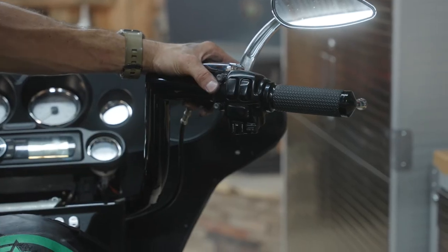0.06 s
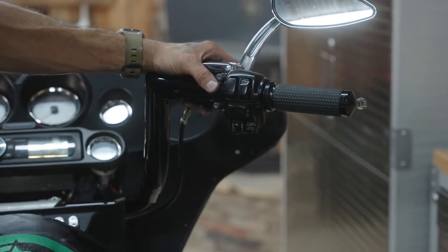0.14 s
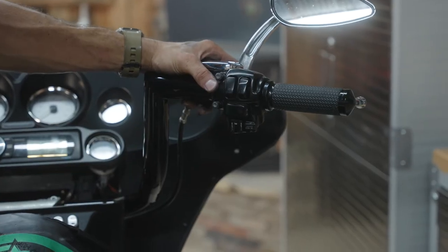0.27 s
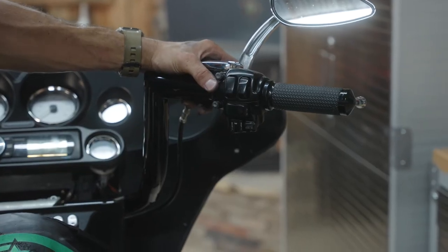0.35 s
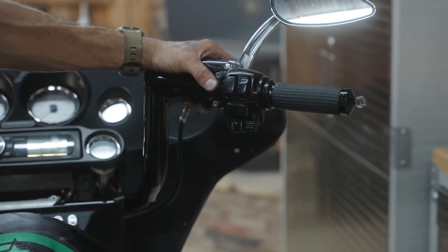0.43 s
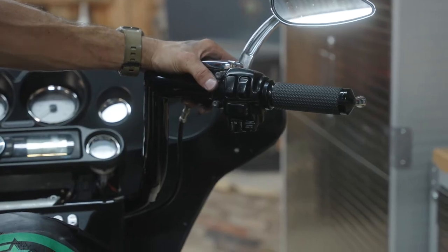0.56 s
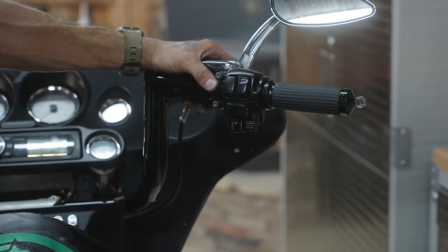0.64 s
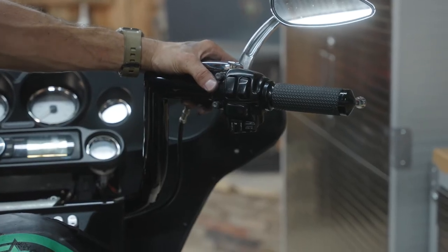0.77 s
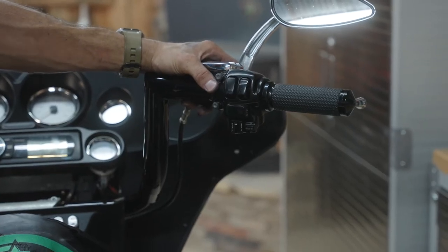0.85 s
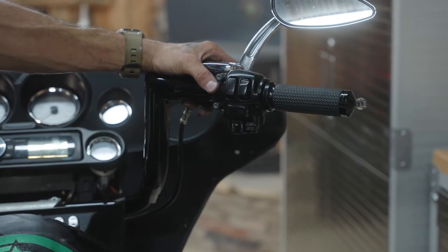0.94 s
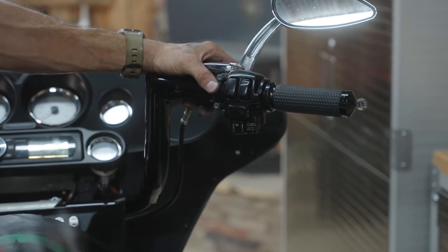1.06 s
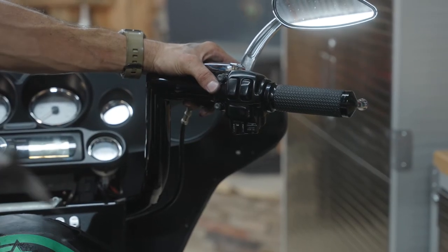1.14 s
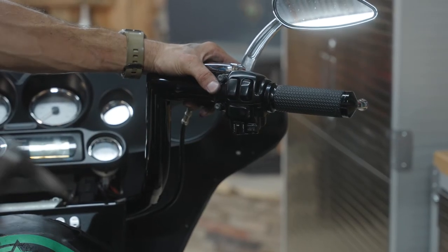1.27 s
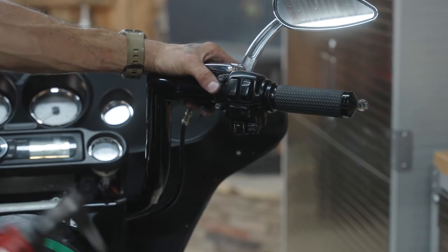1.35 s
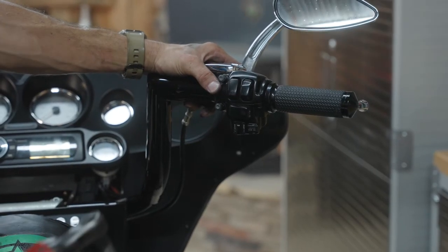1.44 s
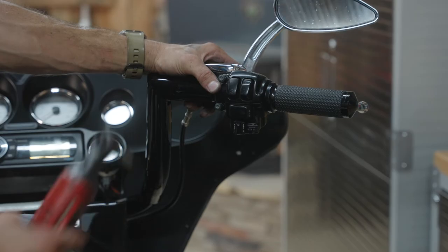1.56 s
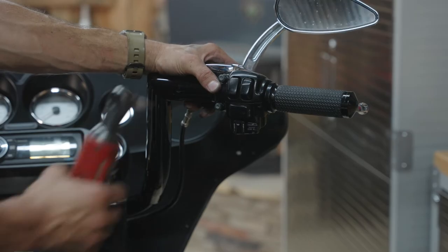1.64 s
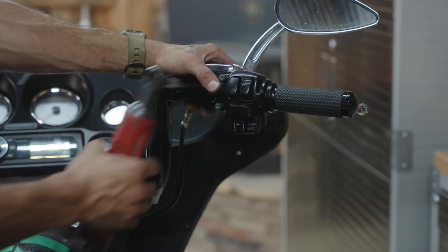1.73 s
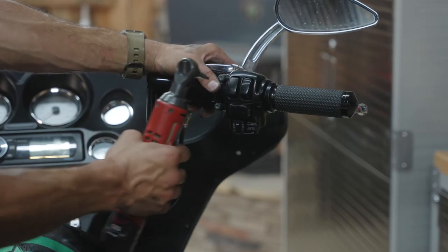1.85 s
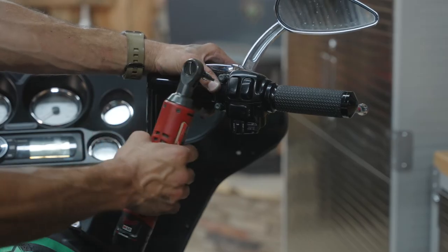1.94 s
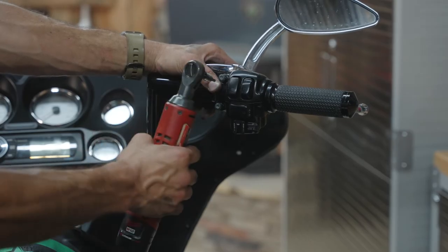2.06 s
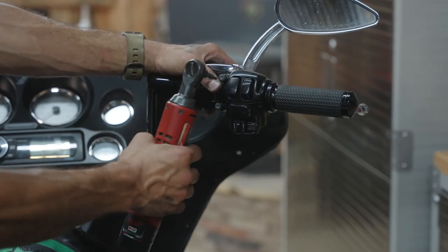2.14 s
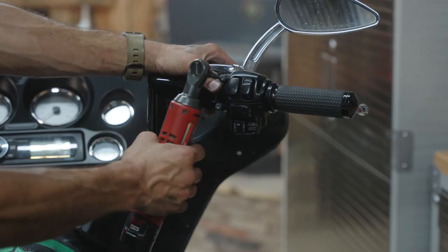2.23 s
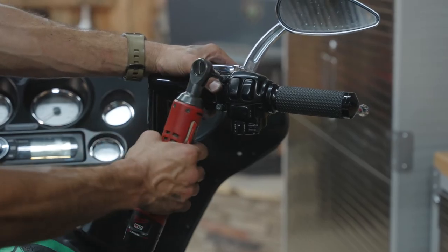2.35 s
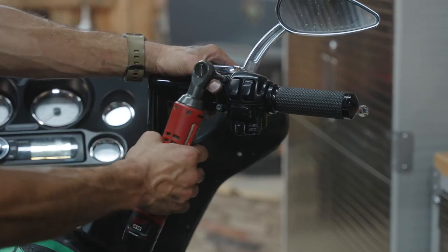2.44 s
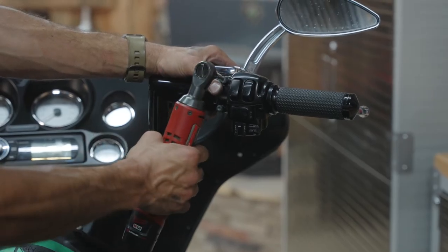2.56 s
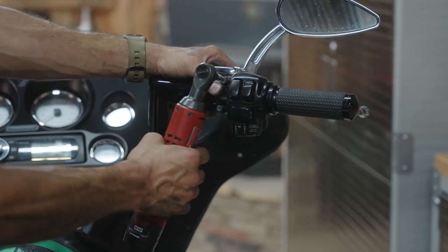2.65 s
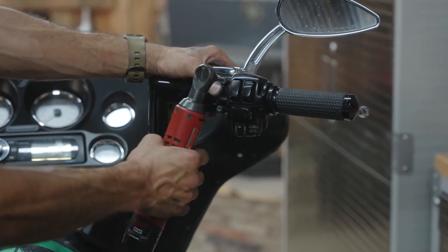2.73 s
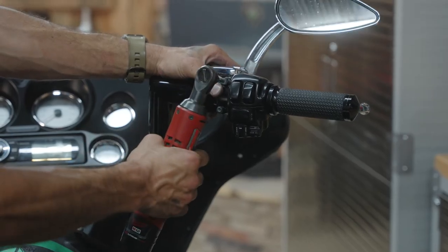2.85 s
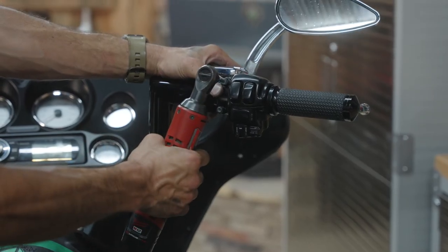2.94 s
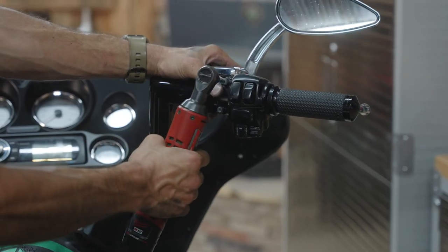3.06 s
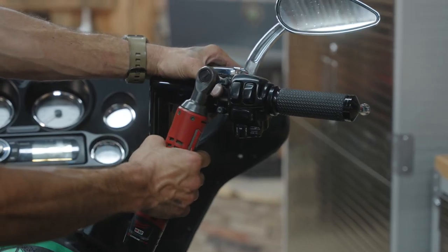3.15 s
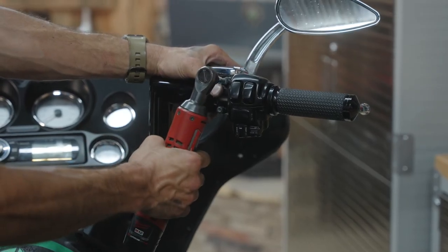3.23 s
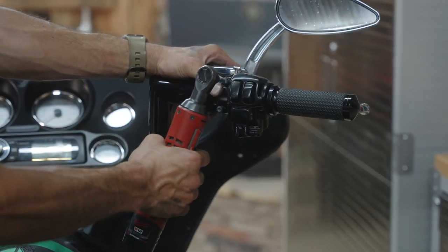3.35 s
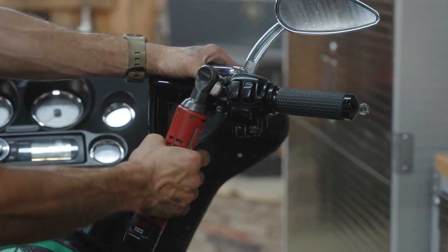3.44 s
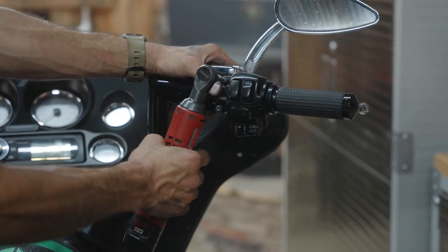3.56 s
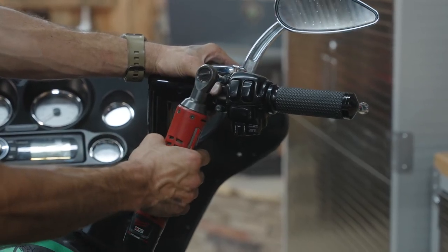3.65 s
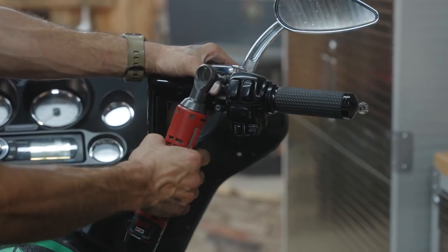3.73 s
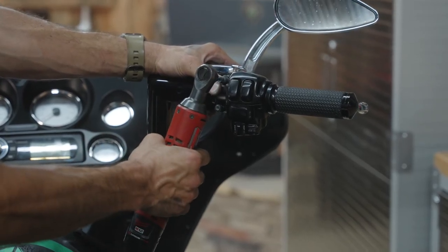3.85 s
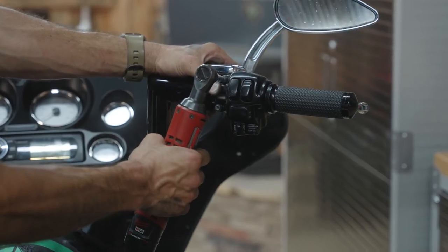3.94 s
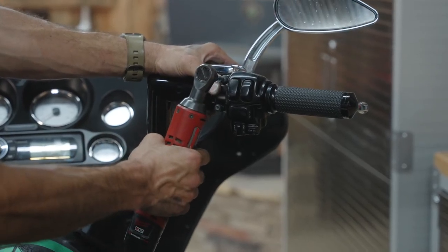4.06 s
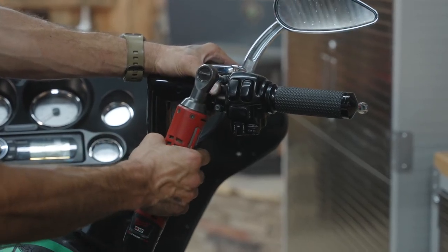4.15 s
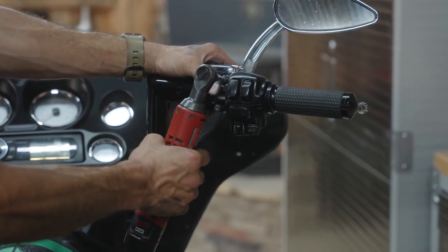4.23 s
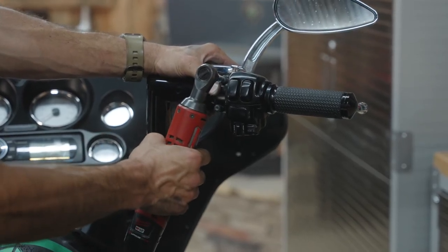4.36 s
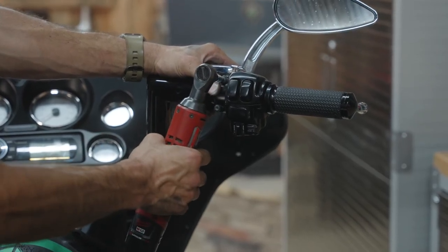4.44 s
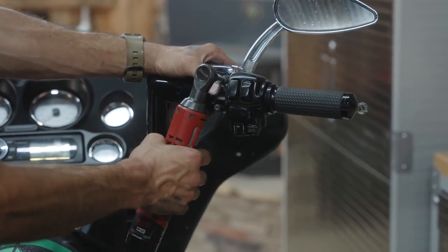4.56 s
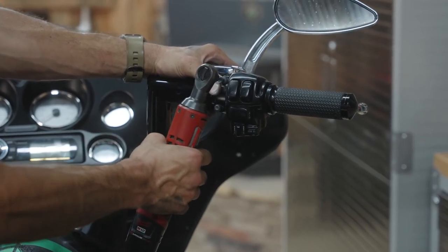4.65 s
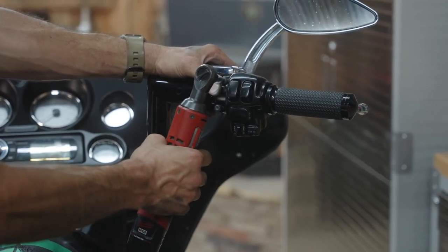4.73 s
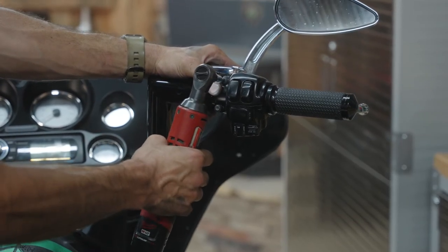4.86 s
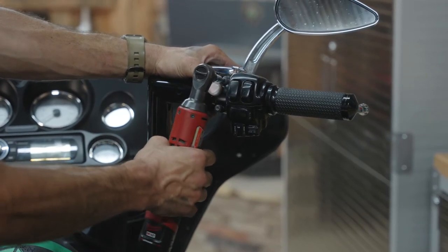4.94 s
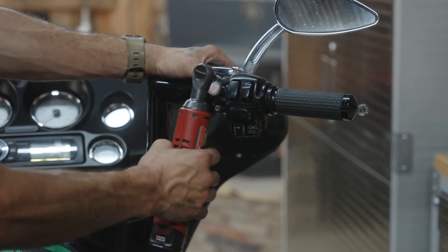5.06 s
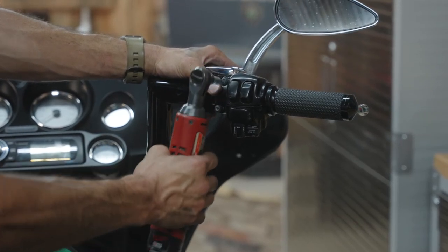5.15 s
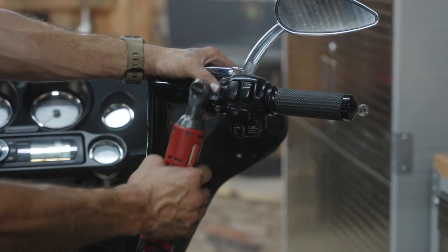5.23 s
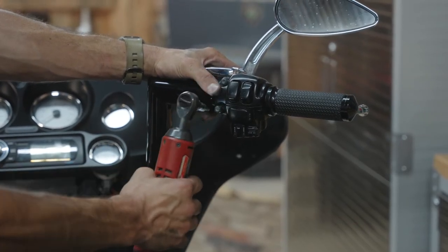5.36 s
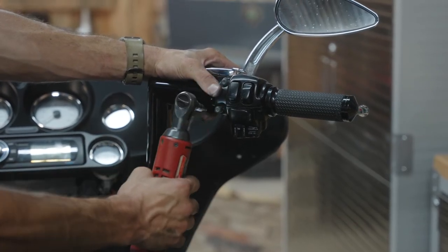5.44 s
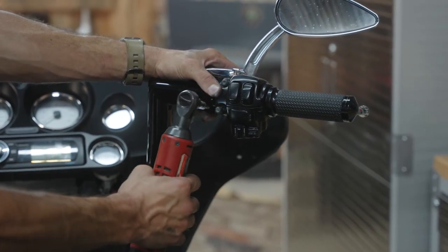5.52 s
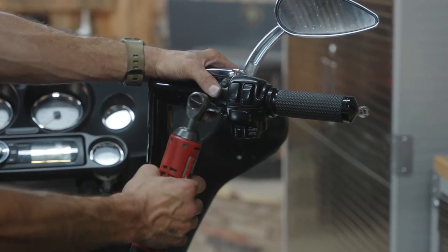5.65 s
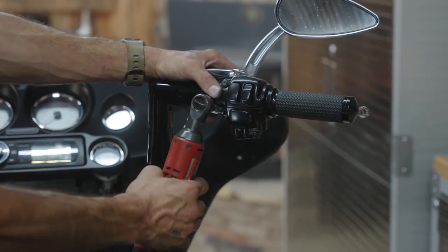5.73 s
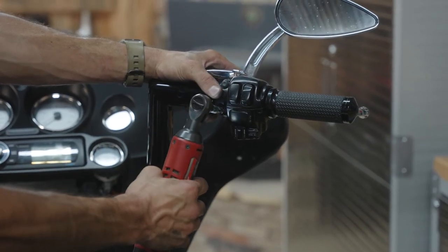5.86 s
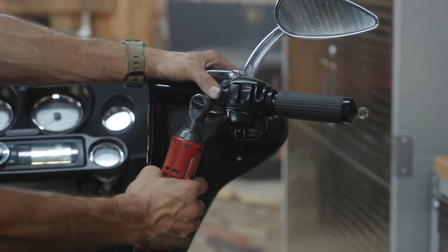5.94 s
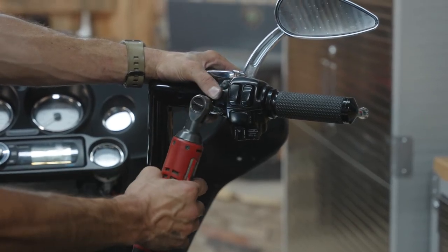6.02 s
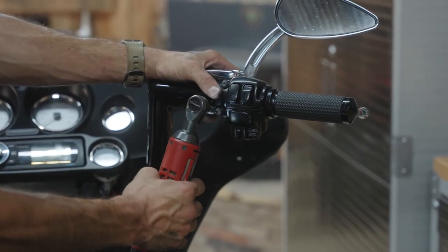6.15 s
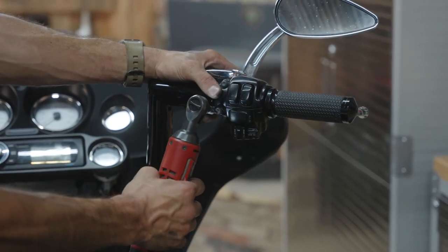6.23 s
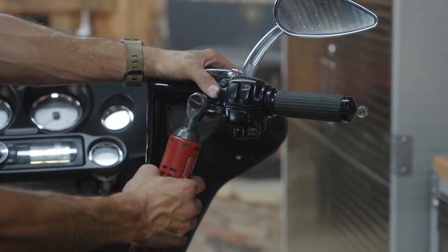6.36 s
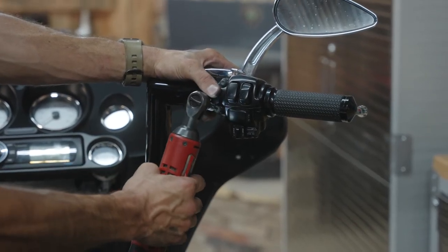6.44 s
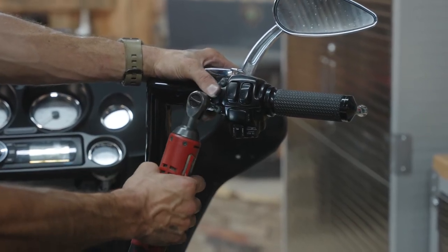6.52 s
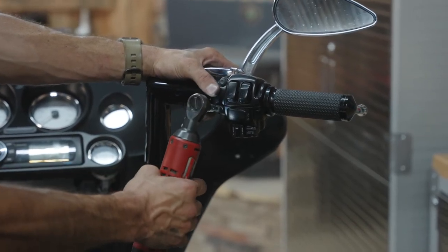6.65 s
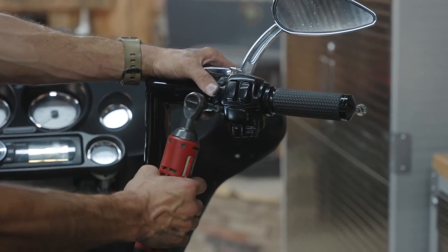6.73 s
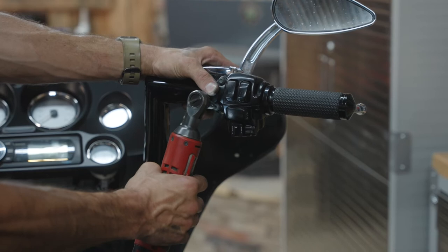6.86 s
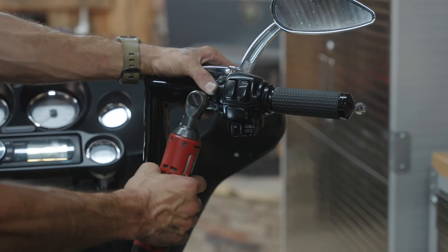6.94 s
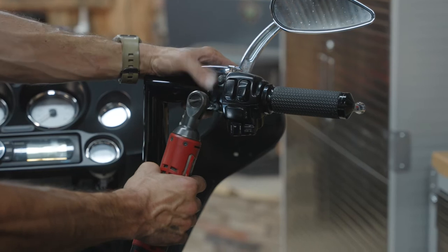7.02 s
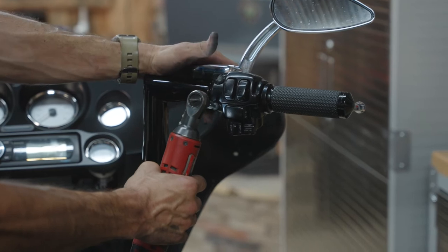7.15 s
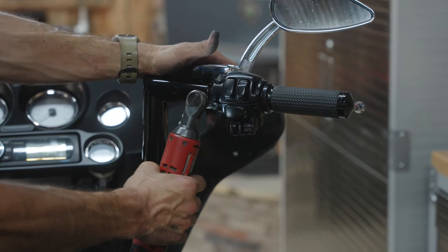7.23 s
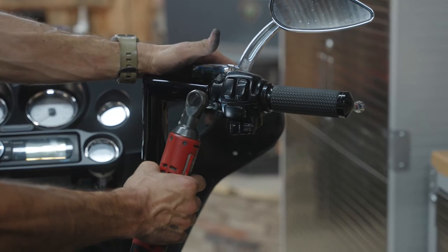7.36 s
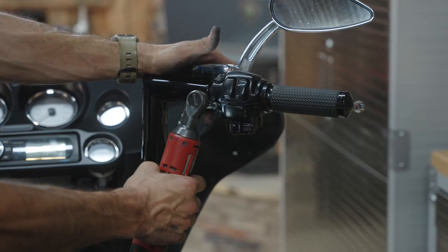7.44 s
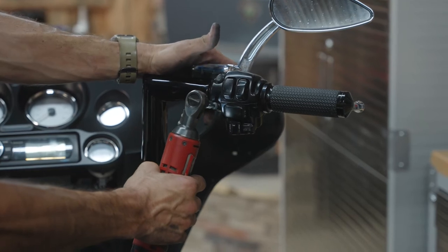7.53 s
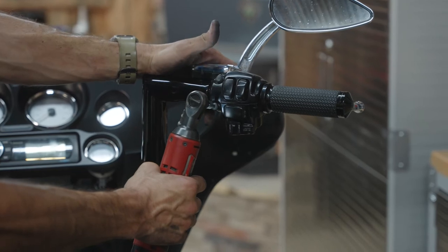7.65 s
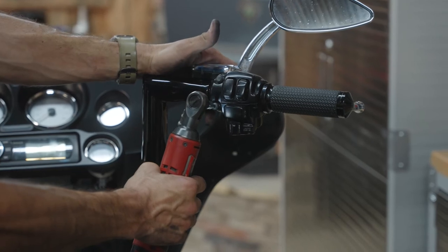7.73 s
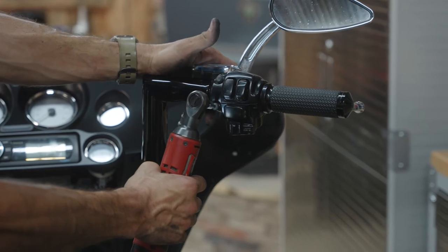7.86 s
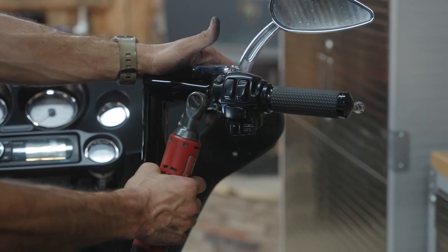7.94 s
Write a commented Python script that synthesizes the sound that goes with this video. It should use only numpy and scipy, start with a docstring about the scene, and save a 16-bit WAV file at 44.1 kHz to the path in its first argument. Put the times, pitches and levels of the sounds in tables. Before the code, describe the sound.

A close garage scene with low ventilation hum and soft air. From 0.1 to 1.7 s there are light handling clicks, a cluster of plastic and steel knocks around 1.0 s, short scratchy rubs near 1.2 s and a soft hollow bump at 1.6 s; faint taps follow at 2.4 s. At about 2.55 s a cordless ratchet whines briefly and bursts into a loud, harsh rattle, sags around 2.8 s, then runs steadily from 2.95 to 4.4 s: fast uneven metallic clatter over a growling motor. It slows into separate clacks and stops by 5.0 s, with a short echo. The room hum, ducked by the noise, slowly returns. Small clinks and scrapes at 6.1 to 6.5 s seat the socket, one ringing brightly. A short burst at 6.6 s winds down, then the ratchet runs from 7.0 s, dips slightly near 7.65 s and continues to the end at 8 s.

```python
"""In a garage, close to the microphone, a cordless ratchet runs down two bolts on a motorcycle handlebar clamp.
The crank spins up while the trigger is held and coasts when it is let go. Three uneven blows a turn
ring the housing, steel head, pawl and socket, louder at speed. Before each run the tool is picked up or
seated with light clicks and rubs: bursts of noise through damped modes, and grainy sliding noise.
The recorder's gain control ducks the room hum under the tool and lets it back slowly."""
import sys
import numpy as np
from scipy import signal
from scipy.fft import rfft, irfft
from scipy.io import wavfile
from scipy.ndimage import uniform_filter1d

SR = 44100
rng = np.random.default_rng(int(sys.argv[2]) if len(sys.argv) > 2 else 0)


def to_wav(sig):
    """Store sig (one row per channel, or 1-D mono) as 16-bit WAV at the path in sys.argv[1].

    Samples outside -1..1 are clipped; the rate is SR.
    """
    pcm = np.clip(np.atleast_2d(sig), -1, 1) * 32767
    pcm = np.round(pcm).astype(np.int16)
    wavfile.write(sys.argv[1], SR, pcm.T)  # frames by channels


N = 352359
T = np.arange(N) / SR  # time in seconds


def undb(db):
    """Decibels to gain."""
    return 10 ** (np.asarray(db) / 20)


def unit(x):
    """Scale to an energy of one."""
    return x / np.sqrt(np.sum(x ** 2))


def noise():
    """White noise of rms one."""
    return rng.standard_normal(N)


def through(x, response):
    """Pass a sound through an impulse response."""
    return signal.oaconvolve(x, response)[:len(x)]


def colour(points, size=4096):
    """Causal (minimum-phase) impulse response of unit energy with the given (Hz, dB) spectrum."""
    hz, db = np.transpose(points)
    bin_hz = np.arange(size // 2 + 1) * SR / size
    log_gain = np.interp(np.log(bin_hz + 1), np.log(hz), np.log(undb(db)))
    # folding the cepstrum forward in time makes the response causal
    cepstrum = irfft(log_gain)
    cepstrum[1:size // 2] *= 2
    cepstrum[size // 2 + 1:] = 0
    return unit(irfft(np.exp(rfft(cepstrum))))


def resonance(hz, width_hz, size=16384):
    """Impulse response of one damped mode, unit energy, silent far below its pitch."""
    click = T[:size] == 0
    b, a = signal.iirpeak(hz, hz / width_hz, fs=SR)
    return unit(signal.lfilter(b, a, click))


def modes(table):
    """Sum of damped modes from rows of (pitch_hz, width_hz, level_db)."""
    return sum(undb(db) * resonance(hz, width) for hz, width, db in table)


def burst(start, decay_s):
    """Contact noise that starts at once and dies away."""
    age = T - start
    live = (age >= 0) & (age < 10 * decay_s)
    out = np.zeros(N)
    out[live] = rng.standard_normal(live.sum()) * np.exp(-age[live] / decay_s)
    return out


def blow(start, decay_s, crack=2):
    """A sharp first contact followed by a short burst of contact noise."""
    out = burst(start, decay_s)
    out[int(start * SR)] += crack * np.sqrt(decay_s * SR / 2)
    return out / np.sqrt(1 + crack ** 2)


def swell(peak_s, width_s):
    """A smooth bell-shaped rise and fall, one at its peak."""
    return np.exp(-.5 * np.minimum(((T - peak_s) / width_s) ** 2, 100))


# low ventilation hum of the room: pitch_hz, level_db
HUM = [(25, -19), (50, -27.5), (80, -16), (110, 1.5), (140, 1), (200, -8), (300, -29.5), (600, -50.5)]
# soft air noise of the room: pitch_hz, level_db
AIR = [(100, -11.5), (240, -2), (450, -3), (700, -1), (1000, -3.5), (2000, -8), (4000, -13.5),
       (8000, -22.5), (16000, -24)]
HUM_DB, AIR_DB = -61, -55  # before the recorder


def background():
    """Steady low ventilation hum and soft air noise, each a coloured noise."""
    hum = through(noise(), colour(HUM))
    air = through(noise(), colour(AIR))
    return undb(HUM_DB) * hum + undb(AIR_DB) * air


# handling clicks: start_s, level_db, pitch_hz of the knock, treble_db relative to the click
CLICKS = [(0.131, -40, 1040, -22), (0.575, -39, 1450, -23), (0.87, -35, 620, -35), (1, -31, 869, -33),
          (1.021, -24, 1010, -37), (1.052, -44, 830, 2), (1.068, -29.5, 1410, -15), (1.1, -36, 3270, -28),
          (1.577, -34.5, 1110, -16), (1.587, -35, 900, -1.5), (1.6, -33, 241, -5), (2.338, -41.5, 1530, -3),
          (2.362, -32.5, 1550, -3.5), (2.482, -37.5, 1190, -32), (5.083, -33, 1100, -30),
          (6.234, -35.5, 1300, -16), (6.517, -34.5, 1130, -11), (6.531, -37, 1160, -6)]
# what the handled tool body rings with: pitch_hz, width_hz, level_db
BODY = [(1010, 200, 3), (1340, 300, 12), (2630, 290, 9), (3200, 220, -6.5), (5460, 400, -22)]
CLICK_DECAY_S = 0.0033


def handling(size=8192):
    """Damped knocks of hand, plastic and steel; each rings the tool body and has a tick on top."""
    knocks, pushes, ticks = np.zeros((3, N))
    for s, db, hz, treble_db in CLICKS:
        i = int(s * SR)
        push = undb(db) * blow(s + .001, CLICK_DECAY_S, crack=.5)[i:i + size]
        knock = resonance(hz, 0.82 * hz, size=2048)
        knocks[i:i + size] += through(push, unit(through(knock, knock)))
        pushes[i:i + size] += push * min(hz / 1000, 1)  # low knocks reach the body's modes less
        ticks[i:i + size] += undb(treble_db) * push
    ringing = through(pushes, unit(modes(BODY)))
    tick = colour([(1000, -1.0), (2800, 3), (6000, 8), (10000, 5.5), (16000, -15.0)])
    return undb(-7) * knocks + undb(-10.5) * ringing + undb(-3) * through(ticks, tick)


# hand and tool slide over things: peak_s, width_s, hiss_db, rasp_db
RUBS = [(.24, 0.08, -66, -65), (.285, 0.0072, -69, -43.5), (.56, 0.16, -68, -66), (1.065, 0.028, -70, -53),
        (1.16, 0.017, -48.5, -52), (1.207, .011, -46, -50), (1.355, 0.018, -58, -75),
        (1.625, 0.025, -57, -64), (1.85, 0.26, -78.5, -63), (6.285, 0.01, -76, -54),
        (6.424, 0.0066, -48, -48)]


def rubs():
    """Grainy sliding noise: skin hisses, harder edges rasp."""
    hiss_grains = noise() * undb(5.1 * noise())
    hiss = through(hiss_grains, colour([(1500, -12.0), (4000, -3.5), (9000, -3), (13000, 0), (16000, -5.5)]))
    rasp_grains = noise() * undb(3.0 * noise())
    rasp = through(rasp_grains, colour([(600, -22), (1400, 5.0), (2600, 4.0), (4500, -5.5), (9000, -12)]))
    out = np.zeros(N)
    for s, width, hiss_db, rasp_db in RUBS:
        out += swell(s, width) * (undb(hiss_db) * hiss + undb(rasp_db) * rasp)
    return out


def fairing_boom(bump_s=1.612, bump_db=-48, lean_s=1.85, lean_db=-57):
    """The hollow fairing booms softly: a short bump, then a longer swell as the arm comes to lie against it."""
    push = undb(bump_db) * swell(bump_s, 0.0087) + undb(lean_db) * swell(lean_s, 0.14)
    hollow = colour([(130, -18), (230, 0.5), (320, 0), (430, -1.0), (700, -23.5), (2000, -40)])
    return push * through(noise(), hollow)


# the motor starts from rest: start_s of the current, free_s when the rotor runs free, whine_db
TRIGGER = [(2.559, 2.6, -43), (6.576, 6.634, -43.5)]
# partials of the motor's whine, lowest first: level_db
WHINE = [-3, -12, -8, -5.5, -16, -16, -12]
# colour of the plastic housing: pitch_hz, level_db
HOUSING = [(110, -41), (240, -26), (400, -20.5), (520, -12), (720, -2.5), (1000, 1.5), (1450, 1),
           (1800, -0.5), (2800, 0.5), (3600, -8.5), (6000, -13)]
# colour of the steel head: pitch_hz, level_db
HEAD = [(1500, -43.5), (3000, -6.5), (3600, -4.5), (4350, 1.5), (5100, -7.5), (6700, 1), (8300, 1),
        (9500, 1.5), (10400, -4.5), (11500, -1), (15000, -31)]


def motor_start(chop_hz=1855):
    """The chopped current makes the stalled motor whine; then the gears begin to scrape."""
    whine = sum(undb(db) * np.sin(2 * np.pi * (k + 1) * chop_hz * T) for k, db in enumerate(WHINE))
    scrape = through(noise(), colour(HOUSING)) + 1.35 * through(noise(), colour(HEAD))
    out = np.zeros(N)
    for start, free, db in TRIGGER:
        stalled = np.interp(T, [start, start + 0.0151, free - .02, free], [0, 1, 1, 0])
        # the scrape rises until the rotor is free, holds, and stops short
        scraping = np.interp(T, [start + 0.019, free], [0, 1]) * (T < free + 0.034)
        out += undb(db) * whine * stalled
        out += undb(-27.5) * scrape * scraping ** 2
    return out


# single clacks as the gears take up their slack or stop: start_s, level_db, knock_db relative to the clack
CLACKS = [(2.605, 13, -32), (2.611, 12, -43), (4.829, -2, -16.5), (4.918, -1, -29), (4.972, 0, -40),
          (4.999, -2.5, -25), (5.006, -10.5, -10), (6.617, -16, -14.5), (6.625, 3.5, -41)]
# colour of the pawl: pitch_hz, level_db
PAWL = [(8000, -39.5), (10700, -6), (12200, 1), (13100, 5), (13900, 4), (14900, -4.5), (15450, 5.5),
        (16500, -14.5)]
# the dull knock of the gear train when it catches: pitch_hz, level_db
KNOCK = [(150, -17.5), (400, -15.5), (1000, 1), (1500, -7.5), (2800, -15), (6000, -7.5), (12000, -40)]


def clacks():
    """Lone drops of the pawl, with a duller knock of the gear train."""
    sharp = sum(undb(db) * blow(s + .001, .0009, crack=.35) for s, db, _ in CLACKS)
    dull = sum(undb(db + knock_db) * blow(s + 0.0011, 0.0057, crack=0.35) for s, db, knock_db in CLACKS)
    steel = undb(-9.0) * through(sharp, colour(PAWL)) + undb(-13.0) * through(sharp, colour(HEAD))
    return steel + undb(2.0) * through(dull, colour(KNOCK))


# the finger on the trigger: pressed_s, let_go_s, setting as a share of the free speed (0-1)
PULLS = [(2.585, 2.74, 1), (2.935, 4.37, 1), (6.61, 6.715, 1), (6.985, 7.62, 1), (7.68, 8, .885)]
# the crank: free speed in turns per second, time constant of spinning up, slowing by friction
FREE_HZ, SPIN_UP_S, COAST_HZ_PER_S = 83.4, .024, 112


def crank_pace():
    """Share of the free speed: nears the trigger's setting while held, then falls at a steady rate."""
    pace = np.zeros(N)
    for pressed, let_go, setting in PULLS:
        held_s = np.clip(T, pressed, let_go) - pressed
        driven = setting + (pace[int(pressed * SR)] - setting) * np.exp(-held_s / SPIN_UP_S)
        lost = COAST_HZ_PER_S / FREE_HZ * np.maximum(T - let_go, 0)
        pace = np.where(T < pressed, pace, np.maximum(driven - lost, 0))
    return pace


def impacts(index, size, pace, chatter, chatter_s, grind):
    """Each blow is a sharp crack, then a short chatter of loose parts; at speed the gears grind in between."""
    cracks = np.zeros(N)
    np.add.at(cracks, index, size)
    energy = signal.lfilter([1 / (chatter_s * SR)], [1, -np.exp(-1 / (chatter_s * SR))], cracks ** 2)
    spiky = noise() * undb(2.1 * noise())
    grinding = pace ** 2 * np.sqrt(np.mean(cracks ** 2)) * noise()
    return cracks + chatter * np.sqrt(energy) * spiky + grind * grinding


def steady(x, size=2600):
    """Even out the slow level to rms one; single blows keep their shape."""
    power = uniform_filter1d(uniform_filter1d(x ** 2, size), size)
    return x / np.sqrt(np.abs(power) + 1e-12)


# one run for each bolt: engage_s of the gears, stop_s of the crank, head_db, housing_db, pawl_db, socket_db
RUNS = [(2.628, 4.97, -9, -17, -6.5, -14.5), (6.648, 8, -6, -16.5, -4, -25.5)]
# the three blows of one turn: place in the turn (0-1), housing_db, head_db, pawl_db
STROKE = [(0, -3, -1, 0), (.3, -1, 0, -3.5), (.61, 0, -4, -9)]
# resonances of the motor case: pitch_hz, width_hz, level_db
CASE = [(172, 28, -13.5), (252, 26, -8), (366, 11, 3), (397.3, 17, 6.5), (507, 18, -5), (610, 24, -5),
        (742.4, 37, 9.5), (830, 32, 9.5)]
# the rattle of the steel parts eases or swells briefly: peak_s, width_s, change_db
LULLS = [(2.91, 0.031, 2.7), (6.81, 0.11, -0.5), (7.15, 0.026, -2), (7.37, .04, -2)]
SOCKET_HZ, SOCKET_WIDTH_HZ = 7430, 330
# each part's loudness grows as this power of the crank's speed
HEAD_POWER, PAWL_POWER, HOUSING_POWER, CASE_POWER = 1.67, 1.65, 0.93, .5
CASE_DB = -33.5  # growl of the motor case at free speed
ENGAGE_S, STOP_S = .012, 0.032  # the rattle sets in and dies out
SCATTER_DB, SLOW_SCATTER_DB = 2, -1  # unevenness of the blows, and its change towards standstill
THRUST = .11  # strength of the crank's even thrust, relative to its blows


def ratchet():
    """The crank strikes three uneven blows a turn, which ring housing, steel head, pawl, socket and case."""
    pace = crank_pace()
    turns = np.cumsum(FREE_HZ * pace) / SR
    count = int(turns[-1])
    place, housing_db, head_db, pawl_db = np.tile(STROKE, (count, 1)).T
    chance = rng.standard_normal((len(place), 5)).T
    place = place + np.repeat(np.arange(count), len(STROKE)) + .016 * chance[0]
    index = np.minimum(np.searchsorted(turns, place), N - 1)

    # one shared force for each blow, plus a little scatter in every part
    force_db = (SCATTER_DB + SLOW_SCATTER_DB * (1 - pace[index])) * np.clip(chance[1], -2, 2)
    thump_size = undb(housing_db + force_db + 1.5 * chance[2])
    clatter_size = undb(head_db + force_db + 0.88 * chance[3])
    snap_size = undb(pawl_db + force_db + 2.1 * chance[4])
    thump = impacts(index, thump_size, pace, chatter=1.6, chatter_s=0.0069, grind=0.82)
    clatter = impacts(index, clatter_size, pace, chatter=2.83, chatter_s=.0015, grind=3.44)
    snap = impacts(index, snap_size, pace, chatter=3.7, chatter_s=0.0017, grind=2.4)

    # at speed the crank's even thrust hums in the case at multiples of the turn
    thrust = sum(np.cos(2 * np.pi * k * turns + rng.uniform(0, 2 * np.pi)) for k in range(2, 13))
    drive = steady(thump) + THRUST * pace ** 3 * thrust
    growl = sum(undb(db) * through(drive, resonance(hz, width)) for hz, width, db in CASE)
    case = pace ** CASE_POWER * steady(growl)
    housing = pace ** HOUSING_POWER * steady(through(thump, colour(HOUSING)))
    head = pace ** HEAD_POWER * steady(through(clatter, colour(HEAD)))
    pawl = pace ** PAWL_POWER * steady(through(snap, colour(PAWL)))
    socket = pace ** HEAD_POWER * steady(through(clatter, resonance(SOCKET_HZ, SOCKET_WIDTH_HZ)))

    lull = undb(sum(db * swell(s, width) for s, width, db in LULLS))
    out = np.zeros(N)
    for start, stop, head_db, housing_db, pawl_db, socket_db in RUNS:
        running = np.interp(T, [start - ENGAGE_S, start, stop, stop + STOP_S], [0, 1, 1, 0])
        steel = undb(head_db) * head + undb(pawl_db) * pawl + undb(socket_db) * socket
        shell = undb(housing_db) * housing + undb(CASE_DB) * case
        # as the crank comes to rest the bright steel fades sooner than the housing
        out += running ** 4 * lull * steel + running * shell
    return out


def spring_ring(tool, t60, ring_db, hz=13000, width_hz=520):
    """Many close modes of the small steel parts in the head store the blows' energy and sing on."""
    band = resonance(hz, width_hz, size=2048)
    band = unit(through(band, band))
    keep = np.exp(-2 * np.log(1000) / (t60 * SR))
    power = through(tool, band) ** 2 * 2 * width_hz / SR
    stored = signal.lfilter([1 - keep], [1, -keep], power)
    return undb(ring_db) * np.sqrt(stored) * through(noise(), band)


# the socket touches the bolt head: start_s, level_db, ring_db of the long ring relative to the touch
CLINKS = [(6.113, -36, -23), (6.269, -39, -26), (6.441, -28, -0.5)]
# what the socket rings with: pitch_hz, width_hz, level_db
CLINK_MODES = [(560, 710, 6), (1590, 1800, 7), (3830, 730, 3), (5300, 660, -1.5), (7700, 1000, -1.5),
               (9200, 700, -14)]


def clinks():
    """The steel socket finds the bolt head; struck squarely, its high modes sing on for a moment."""
    taps = sum(undb(db) * blow(s + 0.00107, 0.0057, crack=0.31) for s, db, _ in CLINKS)
    singing = sum(undb(db + ring_db) * burst(s, 0.017) for s, db, ring_db in CLINKS)
    ringing = through(taps, unit(modes(CLINK_MODES)))
    damped = signal.sosfilt(signal.butter(8, 10300, fs=SR, output="sos"), ringing)
    high_modes = colour([(7000, -18), (8400, 0), (9400, 0), (10600, -16), (11500, -30)])
    return undb(-4.5) * damped + undb(-11.5) * through(singing, high_modes)


def garage(x, wet_db, low_t60, high_t60, split_hz=1800):
    """Diffuse echo; the treble dies sooner, and the pattern of echoes shifts as arm and tool move."""
    t, echoes = T[:SR], []
    low_pass = signal.butter(2, split_hz, fs=SR, output="sos")
    high_pass = signal.butter(2, split_hz, "high", fs=SR, output="sos")
    for _ in range(2):
        low = signal.sosfilt(low_pass, rng.standard_normal(SR)) * np.exp(-np.log(1000) * t / low_t60)
        high = signal.sosfilt(high_pass, rng.standard_normal(SR)) * np.exp(-np.log(1000) * t / high_t60)
        response = 1.15 * low + high
        echoes.append(through(x, unit(response * (t > .003))))
    # the two patterns trade places in a cycle of one second
    shifting = np.cos(2 * np.pi * T) * echoes[0] + np.sin(2 * np.pi * T) * echoes[1]
    return x + undb(wet_db) * shifting


def scene():
    """Tool and handling sound in the garage, over its background."""
    tool = clacks() + ratchet()
    tool = tool + spring_ring(tool, t60=.55, ring_db=-6)
    near = handling() + rubs() + fairing_boom() + motor_start() + tool + clinks()
    return (background() + garage(near, wet_db=-8.5, low_t60=0.54, high_t60=0.51))[None]


THRESHOLD_DB, RATIO, RECOVERY_DB_PER_S = -25, 3, 6.2  # the recorder's gain control


def gain_control(x, size=880):
    """Turns the gain down quickly above the threshold and lets it climb back at a steady rate."""
    level_db = 10 * np.log10(np.abs(uniform_filter1d(x ** 2, size)) + 1e-12)
    wanted_db = (1 - 1 / RATIO) * np.maximum(level_db - THRESHOLD_DB, 0)
    # a running maximum on a rising slope leaves a cut that recovers steadily
    climb_db = RECOVERY_DB_PER_S * T
    cut_db = np.maximum.accumulate(wanted_db + climb_db, axis=-1) - climb_db
    return x * undb(-uniform_filter1d(cut_db, size // 2))


TOP_HZ = 15780  # upper edge of the recorder's band


def record(dry):
    """The recorder rides its gain, rounds the loudest peaks, has a low cut and cuts the top steeply."""
    x = gain_control(dry)
    excess = np.maximum(np.abs(x) - .5, 0)  # the knee lies at half of full scale
    x = np.clip(x, -.5, .5) + np.sign(x) * .2 * np.tanh(excess / .2)
    x = signal.sosfilt(signal.butter(4, 70, "high", fs=SR, output="sos"), x)
    return signal.sosfilt(signal.ellip(12, .2, 80, TOP_HZ, fs=SR, output="sos"), x)


dry = scene()
out = record(dry)
to_wav(out)
```